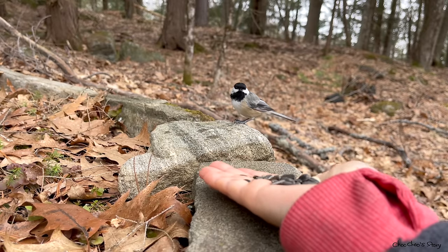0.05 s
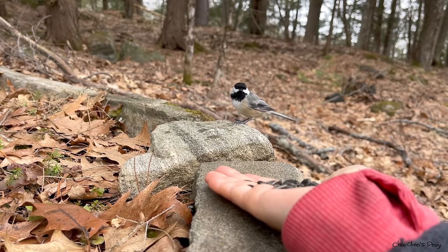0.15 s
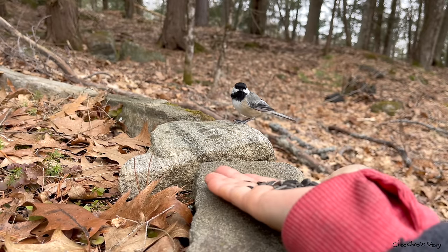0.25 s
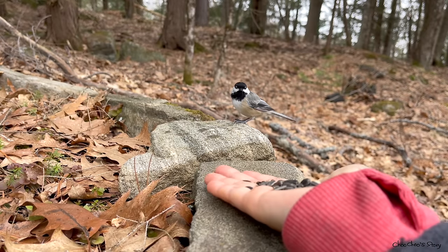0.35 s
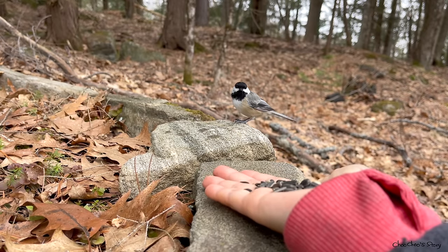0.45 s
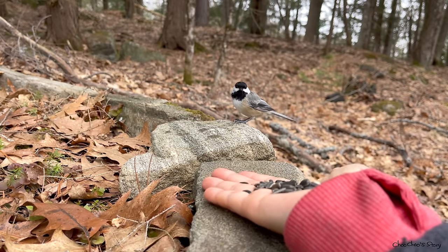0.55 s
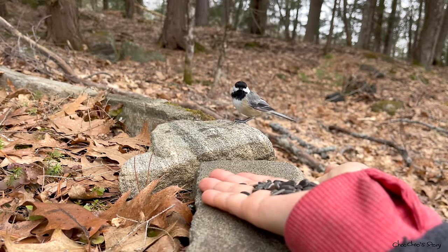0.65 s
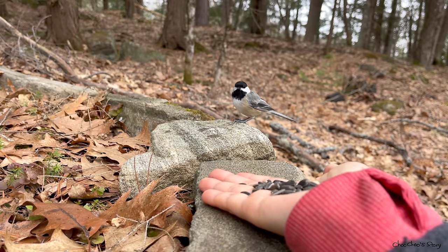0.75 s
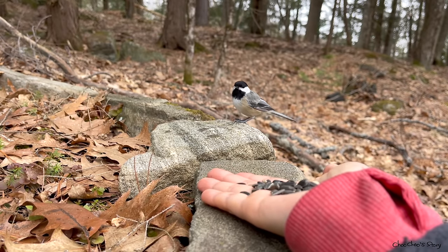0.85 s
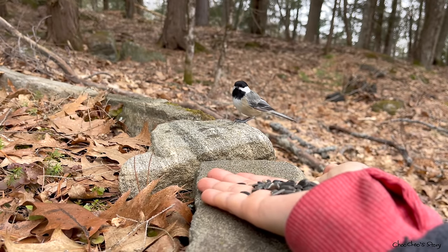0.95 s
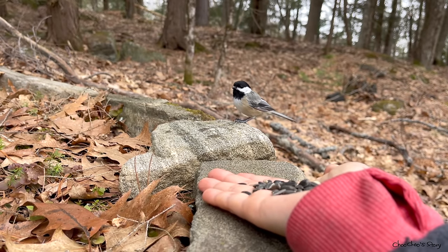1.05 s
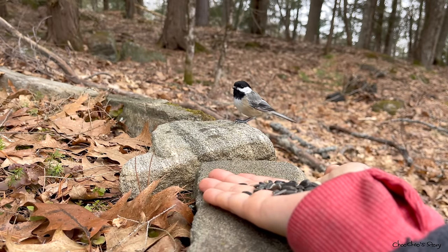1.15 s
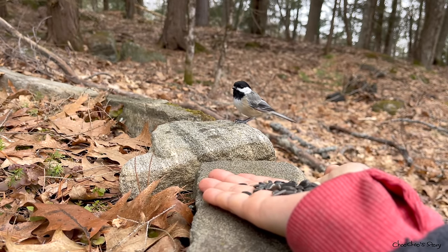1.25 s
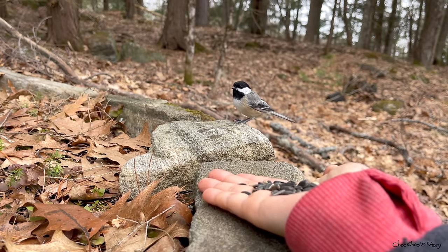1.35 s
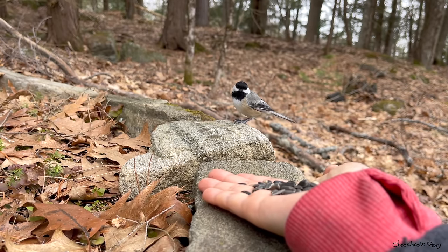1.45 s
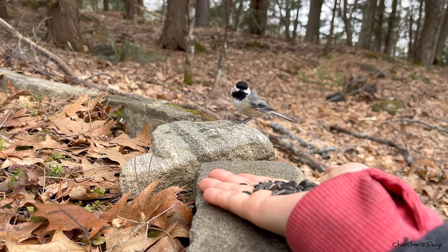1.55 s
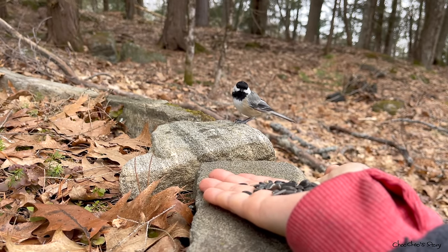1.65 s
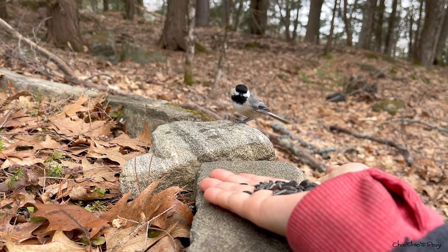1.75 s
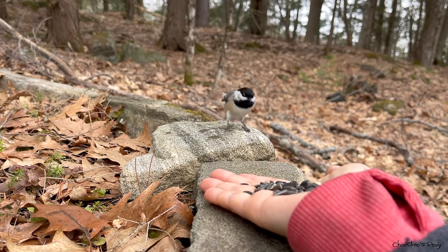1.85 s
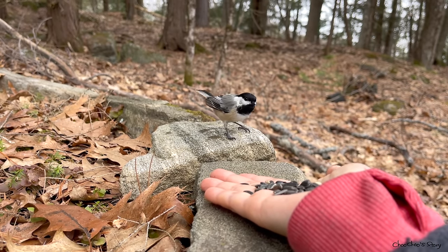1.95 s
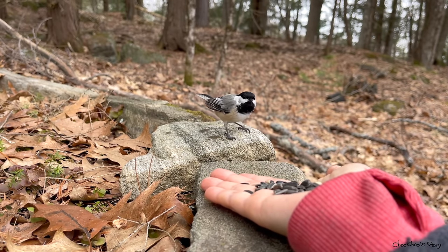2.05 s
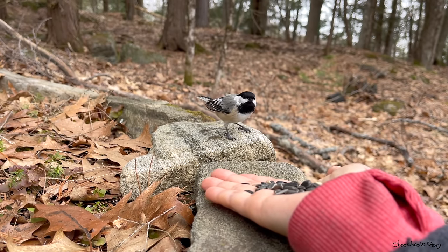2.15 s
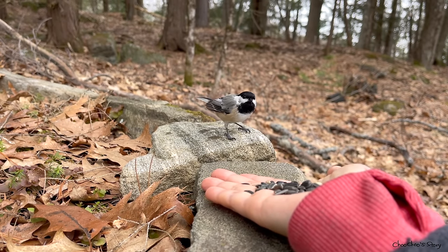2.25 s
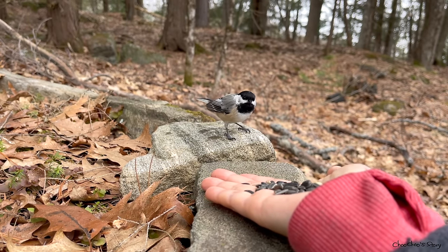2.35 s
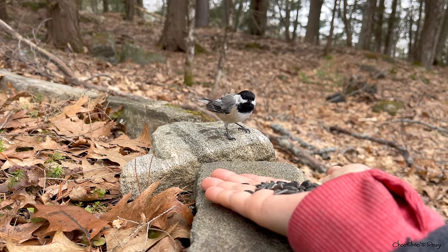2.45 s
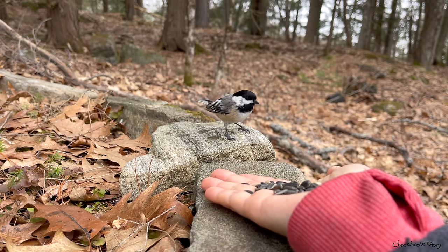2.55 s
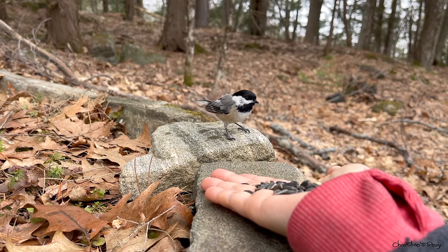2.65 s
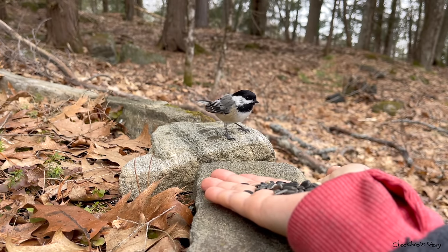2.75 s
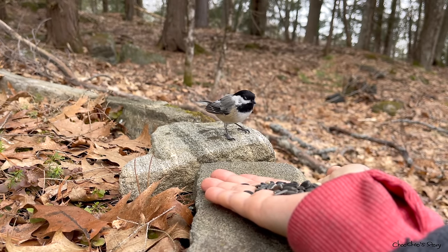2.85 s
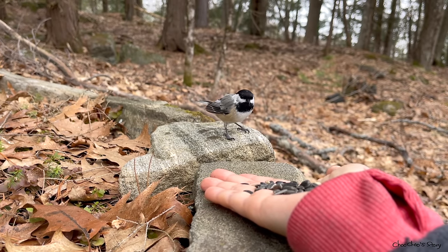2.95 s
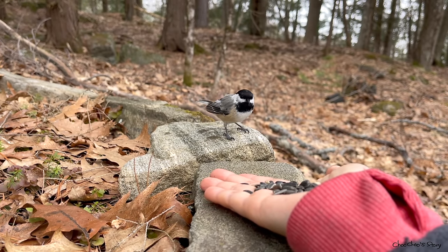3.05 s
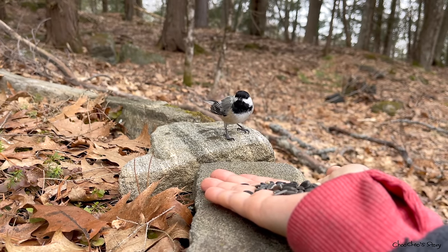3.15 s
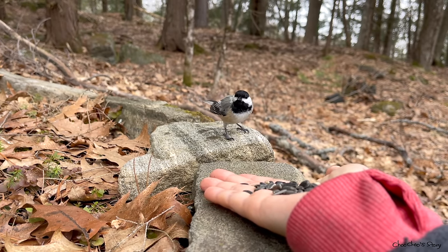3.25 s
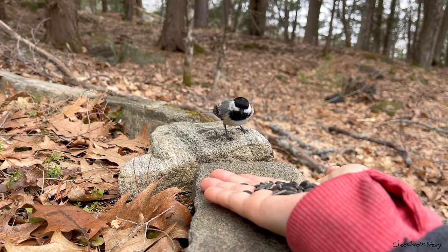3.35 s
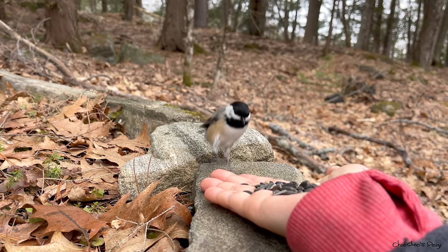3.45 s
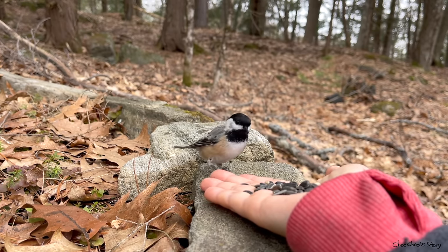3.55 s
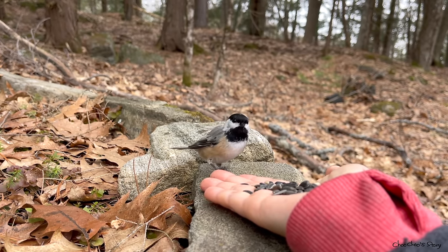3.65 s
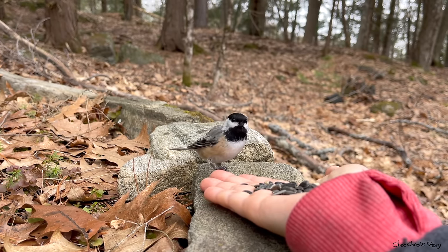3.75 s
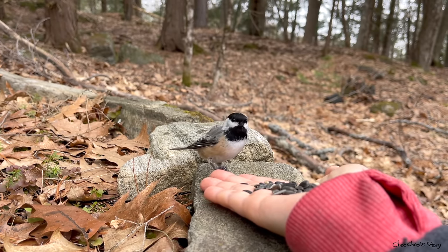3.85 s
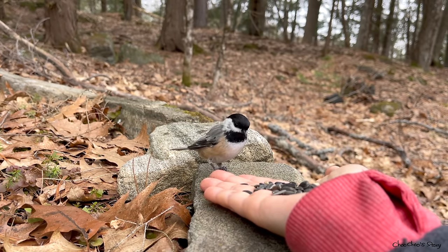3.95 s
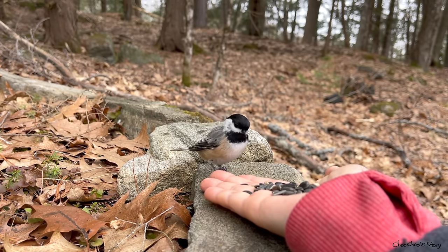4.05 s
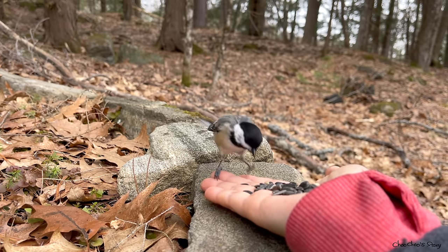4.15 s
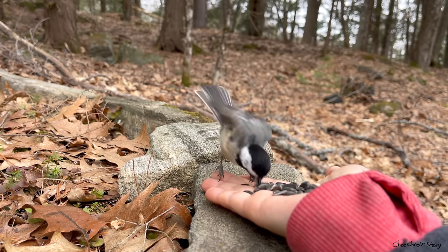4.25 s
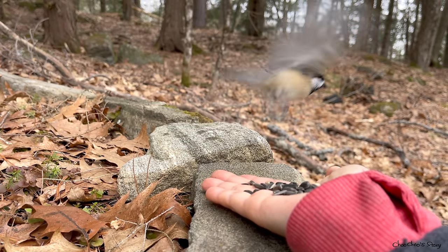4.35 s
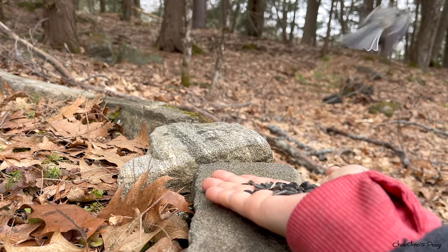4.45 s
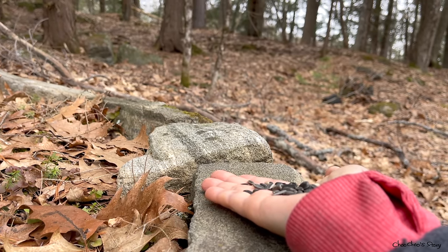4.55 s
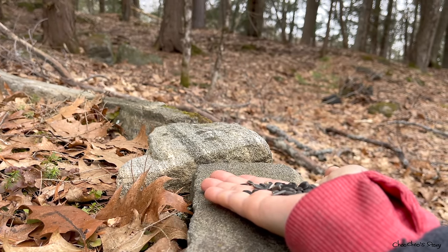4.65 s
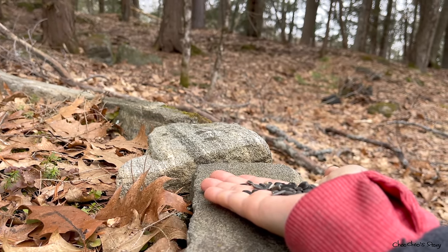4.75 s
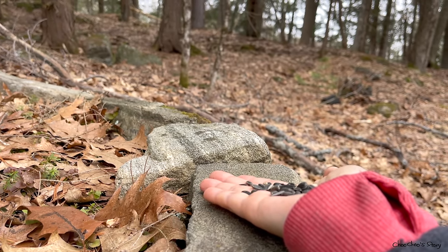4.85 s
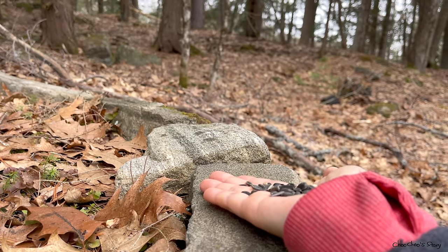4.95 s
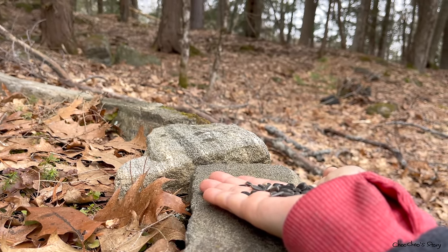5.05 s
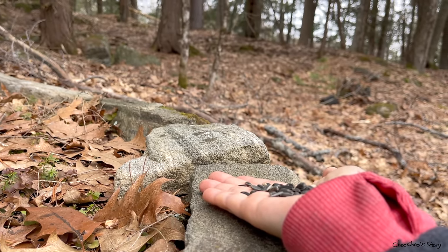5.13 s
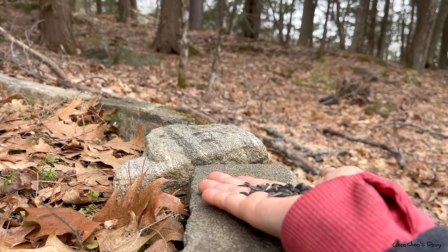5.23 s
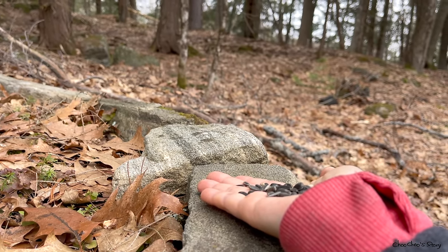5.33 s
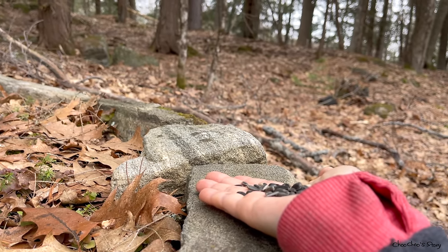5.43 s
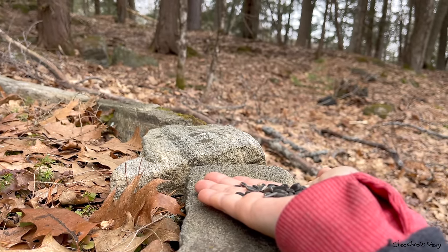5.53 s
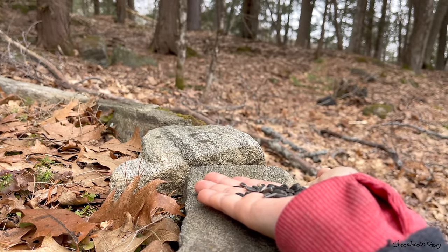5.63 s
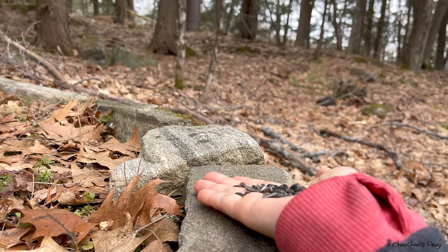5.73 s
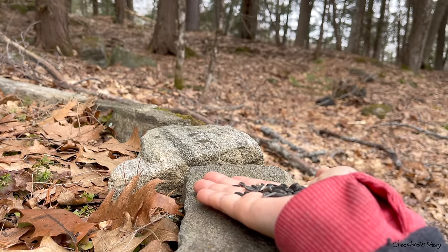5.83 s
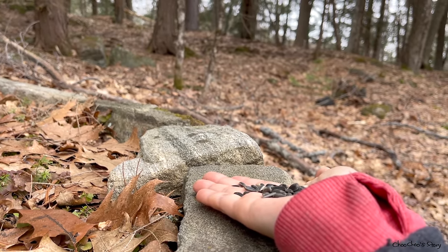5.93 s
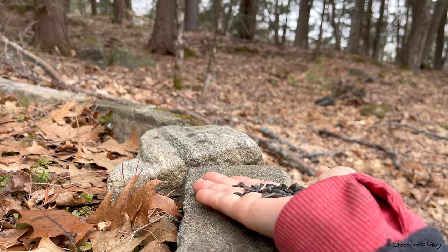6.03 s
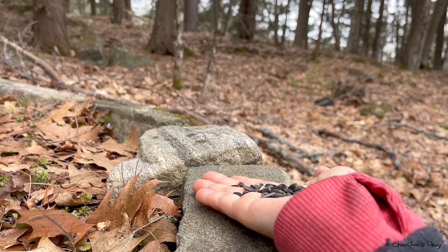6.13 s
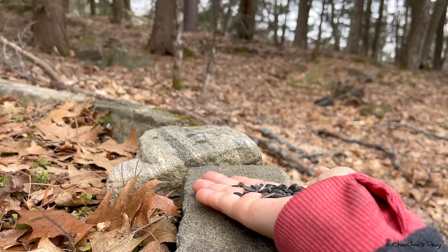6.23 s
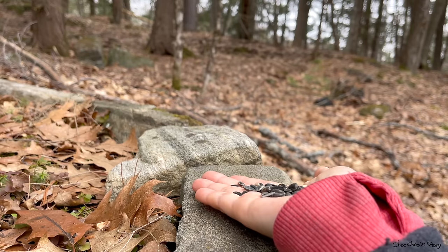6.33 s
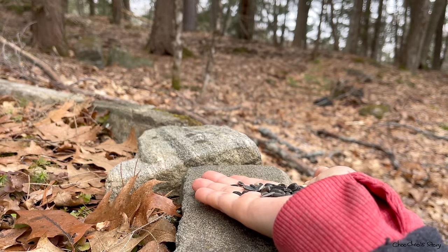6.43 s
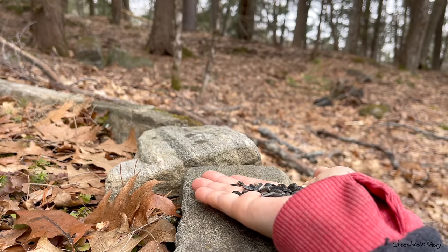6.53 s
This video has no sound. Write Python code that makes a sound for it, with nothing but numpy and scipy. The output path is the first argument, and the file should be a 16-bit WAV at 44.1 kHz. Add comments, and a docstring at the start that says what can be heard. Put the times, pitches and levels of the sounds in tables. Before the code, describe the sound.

A quiet woodland with soft, low distant traffic rumble swelling gently throughout, a faint wavering hum and slight hiss. A small songbird close by gives very short, thin whistled chips around 7 kHz: faint at 0.0, clear at 0.37, weaker at 1.35, 2.5 and 2.9, then by far the loudest, piercing, at 3.3. Tiny dry claw ticks sound around 1.75-1.85, 2.8-3.0 and 3.4. A far crow caws hoarsely with long echoes at 3.5, 4.0, 4.5 and 4.9, very faint. From 4.2 to 4.7 wings flutter close: about 25 rapid soft whumps a second, feather hiss, brief airy whistles and crackling seed ticks, fading away. A weaker flutter follows at 4.9-5.0. Faint echoing chips come at 5.2 and 6.0, crisp ticks at 5.5, and small wing puffs with leaf ticks at 6.0-6.2 and 6.3-6.5.

```python
"""A small songbird whistles thin, arching chirps with echoes; later its wings beat in short bursts.
Wing noise is made of air pushes, low whumps, hissing feathers and brief feather whistles.
Claws, husks, quills and dry leaves tick close by as short noise puffs; a far crow caws in hoarse pulses.
Behind it, shaped noise makes distant traffic and phone hiss, while wavering tones make a hum."""
import sys
import numpy as np
from scipy import signal
from scipy.fft import rfft, irfft, next_fast_len
from scipy.io import wavfile
from scipy.ndimage import uniform_filter1d, map_coordinates

SR = 44100
rng = np.random.default_rng(int(sys.argv[2]) if len(sys.argv) > 2 else 0)


def inscribe(sig):
    """Save sig as 16-bit PCM at rate SR to the path in sys.argv[1].

    A 1-D sig is mono; a 2-D sig holds one channel per row.
    Samples are clipped to [-1, 1] before scaling.
    """
    pcm = np.round(np.clip(np.atleast_2d(sig).T, -1, 1) * 32767)
    wavfile.write(sys.argv[1], SR, pcm.astype(np.int16))


N = 290574  # samples

# In noise colours the levels are relative: noise() scales the whole to rms 1.
# Traffic swells: (time [s], rumble [dB], roar [dB], drone [dB])
TRAFFIC = [(0, -48.5, -56, -67), (.4, -46.5, -55, -61), (.94, -46.5, -56, -70.5), (1.38, -43, -56.5, -57.5),
           (1.8, -44, -56, -60), (2.13, -43.5, -57, -55.5), (2.45, -46, -55, -55), (2.84, -44, -54, -58),
           (3.4, -45.5, -54.5, -61), (4.1, -47, -53.5, -62), (5.0, -45.5, -54, -65), (5.5, -44.5, -53, -62),
           (5.91, -47.5, -52.5, -77.5), (6.59, -45, -53, -69.5)]
# Deep traffic noise: (frequency [Hz], relative level per Hz [dB])
RUMBLE = [(11, -55), (18, -35), (32, -19.5), (34, -9.5), (41, -12), (59, 4.5), (92, -1.5), (123, -8),
          (177, -17.5), (200, -19), (260, -41), (440, -120)]
# Higher traffic noise: (frequency [Hz], relative level per Hz [dB])
ROAR = [(76, -35), (130, -4), (205, -12.5), (280, -19), (344, -19), (381, -19.5), (810, -22.5), (2000, -48),
        (2600, -78), (4400, -120)]
# Traffic noise between rumble and roar: (frequency [Hz], relative level per Hz [dB])
DRONE = [(120, -40.5), (170, -2), (230, 1.5), (320, -3.5), (430, -8.5), (600, -39.5), (900, -120)]
# Phone's own hiss: (frequency [Hz], relative level per Hz [dB])
HISS = [(1000, -21.5), (1800, 1), (4000, -2.5), (6000, -3), (8500, -3), (10800, -1), (12000, -5),
        (13200, -25), (14000, -47.5)]
# Loudness of the motor hum: (time [s], level [dB])
HUM = [(0, -56), (.7, -52), (1.25, -51), (1.45, -56), (2, -44), (2.5, -52), (3.3, -49.5), (3.45, -63),
       (3.95, -48.5), (4.17, -61), (4.4, -34.5), (4.72, -42.5), (5.1, -37), (5.35, -45.5), (5.57, -52.5),
       (5.75, -45), (6.25, -47.5), (6.59, -60)]
# Brief far tones: (time [s], hold [s], frequency [Hz], level [dB], wander [Hz])
FAINT_TONES = [(1.63, .13, 2130, -82, 70), (2.27, .5, 221, -59, 1.5)]
# Faint steady whine: (frequency [Hz], width [Hz], level [dB])
WHINE = [(3395, 180, 0)]
WHINE_DB = -90.5
# How alike the two microphone ports hear the background: (frequency [Hz], likeness [-1 to 1])
ALIKE = [(60, .9995), (130, .99), (290, .7), (640, .1), (1300, .2), (2000, .7), (3000, .3), (5000, .5),
         (6000, .97), (7500, .72), (9000, .99), (10800, .72), (12500, .99)]

# Songbird chirps; bend over 1 eases into the top, under 1 flicks up to it; the start is before the scoop:
# (time [s], length [s], level [dB], start [Hz], top [Hz], end [Hz], top at [share of length],
#  bend of the climb [power], loudest at [share of length], octave over level [dB], echo [dB])
CHIRPS = [(0.002, 0.036, -31, 7040, 7630, 4540, 0.85, 0.69, 0.54, -49, -16.5),
          (0.366, 0.053, -21, 7120, 7728, 7377, 0.66, 2.6, 0.46, -22.5, -23),
          (1.35, 0.042, -33.5, 6390, 7620, 5450, 0.88, 1, 0.74, -53, -17),
          (2.512, 0.043, -37, 6770, 7580, 4680, 0.73, 0.56, 0.52, -41, -16),
          (2.875, 0.055, -44, 6340, 7200, 6000, 0.63, 0.45, 0.52, -34, -14),
          (3.323, 0.048, -6.5, 6785, 7514, 7000, 0.65, 3.1, 0.55, -31, -33),
          (3.862, .045, -68.5, 6750, 7650, 6690, 0.69, 1, 0.41, -44, 3),
          (5.226, 0.05, -46, 6690, 7370, 6890, 0.67, 2.8, 0.47, -40, -6.5),
          (6.027, 0.053, -47.5, 6980, 7550, 7400, 0.66, 0.91, 0.34, -44, -1.5)]
# Faint noise band around the whistle: (frequency [Hz], relative level per Hz [dB])
SKIRT = [(4200, -57), (5300, -8.5), (6800, -1), (8200, 3.5), (9200, -57.5)]
FALL_BEND = 2.6  # power
SCOOP_SHARE, SCOOP_S = 0.28, 0.0036  # the onset scoops up by this share of the final drop
EDGE_SOFTNESS, QUAVER_DB = 0.83, .5
OCTAVE_SOFTNESS, OCTAVE_QUAVER_DB, OCTAVE_ECHO_DB = .5, 2.5, 6  # octave echo over the whistle's
TREES_T60_S, FAR_T60_S = 0.23, .2  # chirps with more echo ring longer
BOUNCE_S, BOUNCE_DB = 0.0031, 9  # a copy off the ground, over the echo level

# Ticks of claws, husks, snapping quills and dry leaves:
# (time [s], peak level [dB], body over peak [dB], brush over peak [dB])
TICKS = [(1.7325, -68, -7.5, -15), (1.757, -49, -9, -12), (1.775, -60, 0, -7), (1.8262, -63, -9, -7),
         (1.847, -57, -2, -7), (1.858, -54, -3, -9), (2.4466, -60, -1, -13), (2.82, -55, -6, -8),
         (2.838, -56, -20, 0), (3.003, -48.5, -9, -2), (3.0365, -61, -17, -4.5), (3.441, -50, -1.5, -2.5),
         (3.9419, -61, -6.5, -9.5), (4.0916, -61, -7, -7.5), (4.1966, -47.5, -26, -3),
         (4.2485, -36.5, -25, -19), (4.2893, -44, 13, 11), (4.327, -35.5, 5, 0.5), (4.3667, -30, 0.5, -3.5),
         (4.394, -36.5, 2, -5), (4.409, -27.5, -28, -1.5), (4.4578, -43, -18, 11), (4.487, -46, 7, 5),
         (4.509, -56, 20.5, 19), (4.6076, -59.5, 21.5, 5), (4.667, -52, 10, -1), (4.9225, -54.5, -21, 8.5),
         (5.215, -60, -13.5, -3), (5.227, -59, -10, -5.5), (5.4955, -38.5, -20, -7), (5.509, -43, -11, -4),
         (6.049, -39.5, -13, -29), (6.071, -44, -15, -20), (6.219, -51, -7.5, -14.5),
         (6.356, -38.5, -3.5, -8), (6.538, -48, -14, -23), (4.941, -57, -1, 9.5),
         (4.599, -51.5, -15.5, 9.5)]
TICK_T60_S, TICK_SHEEN_DB = 0.035, -24  # sheen over the peak

# Crow caws: (time [s], length [s], pitch before scoop and sag [Hz], level [dB], shrillness over level [dB],
#  noise over pulse at the onset [times], noise over pulse at the end [times])
CAWS = [(3.513, 0.29, 653.3, -58, -19, 3.7, 4.1), (3.974, 0.29, 693, -56.5, -25, 1.9, 9),
        (4.47, 0.33, 690, -58.5, -28, 3.5, 5.5), (4.924, 0.37, 679.5, -57.5, -25.5, 3.5, 11)]
# Crow's throat: (frequency [Hz], width [Hz], level [dB])
THROAT = [(1204, 720, -4.5), (1840, 860, -9)]
# Crow's throat with the beak opened wider: (frequency [Hz], width [Hz], level [dB])
THROAT_WIDE = [(1303, 740, -6), (1650, 600, -1), (2004, 590, -14)]
# Crow's shrill beak ring: (frequency [Hz], width [Hz], level [dB])
BEAK = [(3280, 560, 0)]
CAW_ATTACK_S, CAW_RELEASE_S, CAW_FADE_DB = .06, .05, 5
CAW_SCOOP, CAW_SAG, CAW_SCOOP_S = 0.26, 0.12, .028  # scoop and sag are shares of the pitch
CAW_OPEN_SHARE, CAW_OPEN_WIDTH = 0.61, 0.26  # the beak is widest at this share of the caw
VOICED_DB, VOICED_THIRD_DB = -4.5, -8

# Wing beats: (time [s], air push [dB], feather hiss [dB])
BEATS = [(4.213, -59, -37), (4.241, -43, -68), (4.284, -22.5, -36), (4.3274, -25, -36.5),
         (4.3614, -19.5, -37.5), (4.405, -23.5, -35.5), (4.4413, -26.5, -58), (4.48, -27, -68),
         (4.525, -29, -43), (4.566, -31, -56), (4.598, -30.5, -46), (4.641, -35, -55), (4.6803, -38, -51.5),
         (4.712, -44, -53), (4.8554, -61, -57), (4.9042, -40.5, -60), (4.941, -44.5, -62),
         (4.983, -42, -72.5), (5.018, -40, -71.5), (6.0423, -44, -59), (6.0925, -39, -47),
         (6.129, -42, -45), (6.1706, -36.5, -45.5), (6.314, -52.5, -50.5), (6.351, -38, -55),
         (6.38, -39.5, -57), (6.536, -54, -54)]
# Steady rubbing of feathers and leaves, with draught on the ports:
# (time [s], hold [s], hiss [dB], swish [dB], scrape [dB], gloss [dB], draught [dB], time to fall 60 dB [s])
RUSTLES = [(4.221, 0.15, -54, -56, -79, -64, -42.5, 0.27),
           (4.386, 0.031, -40.5, -50.5, -52.5, -63, -29, 0.48),
           (4.874, .05, -69, -62, -76, -95, -62.5, 0.54),
           (5.473, 0.0099, -63.5, -73, -70, -76, -66.5, 0.35), (5.98, .03, -65, -80, -78.5, -74, -68, 0.42),
           (6.032, 0.15, -66, -70.5, -63.5, -99, -41.5, 0.11),
           (6.3, 0.061, -61, -80.5, -63.5, -88.5, -46, 0.18), (6.504, 0.054, -71, -84, -84, -92, -56, 0.41)]
# Bright feather hiss: (frequency [Hz], relative level per Hz [dB])
FEATHER = [(6000, -48), (7500, -9.5), (9000, -4), (10200, 2), (11700, -6.5), (12400, -43), (13200, -40),
           (14000, -120)]
# Softer brushing: (frequency [Hz], relative level per Hz [dB])
BRUSH = [(2200, -44), (3300, -6.5), (5000, -2), (7500, 2.5), (9000, -5), (10500, -52)]
# Broad swish: (frequency [Hz], relative level per Hz [dB])
SWISH = [(500, -1), (1200, 2.5), (2200, -3.5), (3000, -6), (4000, -9), (4600, -30), (6000, -81)]
# Rough scrape: (frequency [Hz], relative level per Hz [dB])
SCRAPE = [(1200, -40), (1600, 15.5), (2100, 15), (2800, 13), (3250, -25), (3600, -1), (4600, 2),
          (5000, -32)]
# Top edge of close strokes: (frequency [Hz], relative level per Hz [dB])
SHEEN = [(11000, -42), (12500, 0), (14000, -7.5), (15500, -12.5)]
# Top edge of steady rubbing: (frequency [Hz], relative level per Hz [dB])
GLOSS = [(11500, -30), (12300, 8), (13400, -10), (14000, -34), (15000, -69)]
# Low thud of moved air: (frequency [Hz], relative level per Hz [dB])
WHUMP = [(90, -37), (150, 3), (200, 4.5), (320, -0.5), (450, -5.5), (800, -12), (1300, -27), (2500, -120)]
# Air snapped under the wing: (frequency [Hz], gain [dB])
CLAP = [(60, -34.5), (140, 1), (230, 3.5), (330, -0.5), (480, -10.5), (800, -14), (1600, -52), (3000, -120)]
PUFF_S = 0.0126
WHUMP_DB, CLAP_DB = -4.5, 32.5  # over the push
SWISH_DB, BRUSH_DB, RUB_BRUSH_DB = -8, -15, -4.5  # over the hiss
SHEEN_DB, SHEEN_GROWS = -54.5, 1.4  # level at the strongest stroke; fades faster than the hiss
RUSTLE_ATTACK_S, FLURRY_DB = 0.022, -14  # flurry: steady low flutter over the draught
CRACKLE_PER_S, CRACKLE_S, CRACKLE_DB = 500, .0008, -8

# Feather whistles: (time [s], top pitch [Hz], level [dB], octave level [dB])
WHISTLES = [(4.376, 1074, -40, -56), (4.413, 1270, -34.5, -57), (4.452, 1252, -37, -58),
            (4.492, 1220, -38.5, -54), (4.534, 1260, -41.5, -50), (4.572, 1260, -43.5, -49),
            (4.614, 1260, -41, -48.5), (4.651, 1254, -45.5, -51), (4.692, 1215, -52, -52.5),
            (4.857, 1290, -59, -68), (4.9, 1276, -61, -61), (4.945, 1250, -50, -63),
            (4.986, 1280, -59.5, -66), (5.011, 1320, -48, -71)]
WHISTLE_S, WHISTLE_TOP_SHARE, WHISTLE_ARCH = .02, .4, .4
WHISTLE_THIRD_DB = -22  # over the octave

# Turn of phase between the channels: (frequency [Hz], lead of the left [radians])
LEAD = [(0, 0), (200, -.08), (600, -.4), (1900, 0), (2600, .7), (4150, .8), (4850, 3.14), (5500, 6.1),
        (6250, 6.35), (7500, 8), (8650, 9.4), (9400, 9.45), (10300, 10.6), (12000, 12.5), (13400, 12.6),
        (14200, 14.3), (15600, 14.6)]
# Level tilt between the channels: (frequency [Hz], left over right [dB])
TILT = [(100, 0), (300, 1.7), (700, .8), (1200, 0.8), (2500, -0.9), (5000, 0)]
BASS_CUT_HZ, TOP_HZ = 25, 15900


def amp(db):
    """Turns dB into gain."""
    return 10 ** (np.asarray(db) / 20)


def unit(x):
    """Scales a sound to rms 1."""
    return x / np.sqrt(np.mean(x ** 2) + 1e-20)


def along(points, hz):
    """Reads a curve of (frequency [Hz], value) points on a log axis."""
    f, v = np.transpose(points)
    return np.interp(np.log(hz + 1), np.log(f + 1), v)


def curves(rows):
    """Gives one value per sample for each column after the time."""
    s, *cols = np.transpose(rows)
    return [np.interp(np.arange(N) / SR, s, c) for c in cols]


def wobble(rate):
    """Makes a smooth random curve with this many knots a second."""
    knots = rng.standard_normal(int(N * rate / SR) + 4)
    return map_coordinates(knots, [np.arange(N) * rate / SR])


def filtered(x, response):
    """Shapes x by a complex response over frequency."""
    m = next_fast_len(N + SR // 2)
    return irfft(rfft(x, m) * response(np.fft.rfftfreq(m, 1 / SR)), m)[..., :N]


def noise(spectrum, alike=((1, 1),)):
    """Makes stereo noise of rms 1 whose channels share the given likeness."""
    def colour(hz):
        turn = np.arccos(np.clip(along(alike, hz), -1, 1)) / 2
        return amp(along(spectrum, hz)) * [np.cos(turn), np.sin(turn)]
    mid, side = filtered(rng.standard_normal((2, N)), colour)
    return unit(np.array([mid + side, mid - side]))


def modes(table, hz):
    """Causal response of a table of resonances, applied twice for steep flanks."""
    total = 0
    for k, (centre, width, db) in enumerate(table):
        ring = 1j * hz * width / (centre * centre - hz * hz + 1j * hz * width)
        total = total + (-1) ** k * amp(db / 2) * ring
    return total ** 2


def held(s, hold, attack, t60):
    """Loudness curve: straight rise, hold, then exponential fall."""
    t = np.arange(N) / SR - s
    return np.clip(t / attack, 0, 1) * amp(-60 * np.maximum(t - attack - hold, 0) / t60)


def puffs(times, levels_db, fall, rise):
    """Loudness curve of overlapping puffs, each a soft rise and an exponential fall."""
    env, t = np.zeros(N), np.arange(SR // 5) / SR
    puff = (1 - np.exp(-(t / rise) ** 2)) * np.exp(-t / fall)
    for s, db in zip(times, levels_db):
        add(env, s - rise, amp(db) * puff)
    return env


def add(track, s, sound):
    """Mixes a sound into the track at s seconds."""
    part = track[..., round(s * SR):round(s * SR) + sound.shape[-1]]
    part += sound[..., :part.shape[-1]]


def echoes(x, t60, alike):
    """Scatter from trunks and ground: a fading noise tail of energy 1, partly shared by the ports."""
    t = np.arange(int(SR * .8)) / SR
    shared, split = rng.standard_normal((2, len(t))) * amp(-60 * t / t60)
    turn = np.arccos(np.clip(alike, 0, 1)) / 2
    tail = np.cos(turn) * shared + np.sin(turn) * np.array([split, -split])
    return signal.fftconvolve(x[None], tail / np.linalg.norm(tail[0]), axes=1)


def crackle():
    """Gain that bumps up at random instants and drops back within milliseconds."""
    draw, t = rng.random((2, N)), np.arange(SR // 50) / (CRACKLE_S * SR)
    snaps = (draw[0] < CRACKLE_PER_S / SR) * amp(CRACKLE_DB) * -np.log(1 - draw[1])
    return unit(1 + signal.fftconvolve(snaps, t * np.exp(1 - t))[:N])


def background():
    """Far traffic noise in swells, a wavering motor hum, faint tones and steady microphone hiss."""
    rumble_db, roar_db, drone_db = curves(TRAFFIC)
    hum_db, = curves(HUM)
    rumble = amp(rumble_db + 2.2 * wobble(6.8)) * noise(RUMBLE, ALIKE)
    roar = amp(roar_db + 0.66 * wobble(4.0)) * noise(ROAR, ALIKE)
    drone = amp(drone_db + 1.5 * wobble(4.6)) * noise(DRONE, ALIKE)
    hum_hz = 121 + 1.541 * wobble(3.7)
    hum = amp(hum_db + 0.48 * wobble(12)) * np.sin(2 * np.pi * np.cumsum(hum_hz) / SR)
    ringing = unit(filtered(rng.standard_normal(N), lambda f: modes(WHINE, f)))
    whine = amp(WHINE_DB + 1.5 * wobble(2.2)) * ringing
    tones = np.zeros(N)
    for s, hold, hz, db, wander in FAINT_TONES:
        level = held(s, hold, .05, .4) * amp(db + 4.2 * wobble(12))
        tones += level * np.sin(2 * np.pi * np.cumsum(hz + wander * wobble(60)) / SR)
    return rumble + roar + drone + hum + whine + tones + amp(-74) * noise(HISS, ALIKE)


def chirps():
    """A whistled arch of pitch with a faint octave, a near bounce off the stones, then echo in the trees."""
    out, skirt_noise = np.zeros((2, N)), noise(SKIRT)[0]
    quaver, burr = amp(QUAVER_DB * wobble(680)), amp(OCTAVE_QUAVER_DB * wobble(1400))
    for s, length, db, start, top, end, crest, bend, loudest, octave_db, echo_db in CHIRPS:
        u = np.arange(int(length * SR)) / (length * SR)  # share of the chirp gone by
        now = slice(round(s * SR), round(s * SR) + len(u))
        rising = top - (top - start) * (np.maximum(crest - u, 0) / crest) ** bend
        rising -= SCOOP_SHARE * (top - end) * np.exp(-u * length / SCOOP_S)
        falling = (top - end) * (np.maximum(u - crest, 0) / (1 - crest)) ** FALL_BEND
        hz = uniform_filter1d(rising - falling, size=110, mode="nearest")
        phase = 2 * np.pi * np.cumsum(hz) / SR
        # bending time puts the middle of the sine arch at the loudest point
        peak_bend = np.log(.5) / np.log(np.clip(loudest, .1, .9))
        swell = np.sin(np.pi * u ** peak_bend) ** EDGE_SOFTNESS * quaver[now]
        skirt = amp(-39 - 12 * u) * skirt_noise[now]
        call = amp(db + 3) * swell * (np.sin(phase) + skirt)
        octave = amp(db + octave_db) * swell ** OCTAVE_SOFTNESS * burr[now] * np.sin(2 * phase)
        near = call + octave
        octave_echo = amp(np.minimum(echo_db + OCTAVE_ECHO_DB, -10))
        add(out, s + 0.0054, octave_echo * echoes(octave, t60=.12, alike=0.96))
        add(out, s, near)
        add(out, s + BOUNCE_S, amp(np.minimum(echo_db + BOUNCE_DB, -8)) * call)
        add(out, s + .0015, amp(-24) * echoes(near, t60=.04, alike=.95))
        trees_t60 = TREES_T60_S + FAR_T60_S * amp(np.minimum(echo_db, 0))
        add(out, s + .006, amp(echo_db) * echoes(call, trees_t60, alike=0.94))
    return out


def ticks():
    """Dry contacts: a sharp bright crack over a duller body, both fading at the same rate."""
    s, db, body_db, brush_db = np.transpose(TICKS)
    fall = TICK_T60_S / np.log(1000)
    crack = puffs(s, db, fall, rise=0.00076) * noise(FEATHER, [(1, 1.0)])
    brush = puffs(s, db + brush_db, fall, rise=0.0028) * noise(BRUSH, [(1, 0.31)])
    sheen = puffs(s, db + TICK_SHEEN_DB, fall, rise=0.001) * noise(SHEEN, [(1, .9)])
    body = puffs(s, db + body_db, fall, rise=0.0038) * noise(SWISH, [(1, 1.0)])
    return crack + brush + sheen + body


def crow():
    """Hoarse strong and weak pulses with a voiced core, through a beak that opens and shuts; much echo."""
    dry, shrill, t = np.zeros(N), np.zeros(N), np.arange(N) / SR
    for s, length, pitch_hz, db, shrill_db, hoarse_first, hoarse_last in CAWS:
        u = np.clip((t - s) / length, 0, 1)  # share of the caw gone by
        hz = pitch_hz * (1 - CAW_SAG * u - CAW_SCOOP * np.exp(-u * length / CAW_SCOOP_S))
        cycles = np.cumsum(hz * (1 + .03 * wobble(70))) / SR
        pulse = np.exp(6 * (np.cos(2 * np.pi * cycles) - 1))
        pulse *= 1 + 0.3 * np.cos(np.pi * cycles)  # every other pulse is weaker
        hoarse = hoarse_first + (hoarse_last - hoarse_first) * u ** 2
        rasp = pulse * (1 + hoarse * rng.standard_normal(N))
        rasp /= np.hypot(1, .5 * hoarse)
        rasp *= (u > 0) & (u < 1)
        narrow, wide, beak = [unit(filtered(rasp, lambda f: modes(m, f))) * np.sqrt(length * SR / N)
                              for m in (THROAT, THROAT_WIDE, BEAK)]
        edges = np.minimum(np.minimum(u * length / CAW_ATTACK_S, (1 - u) * length / CAW_RELEASE_S), 1)
        opened = np.exp(-((u - CAW_OPEN_SHARE) / CAW_OPEN_WIDTH) ** 2)
        voiced = np.sin(4 * np.pi * cycles) + amp(VOICED_THIRD_DB) * np.sin(6 * np.pi * cycles)
        voiced *= amp(VOICED_DB + 3.7 * wobble(60))
        level = edges * amp(db - CAW_FADE_DB * u + 0.82 * wobble(29))
        dry += ((1 - opened) * (narrow + voiced) + opened * wide) * level
        shrill += edges * amp(db + shrill_db) * beak
    return dry + shrill + amp(1.5) * echoes(dry, t60=.95, alike=0.4)[:, :N]


def wings():
    """Each beat pushes air at the ports, whumps and hisses; longer rustles crackle and stir a draught."""
    s, push_db, hiss_db = np.transpose(BEATS)
    start, hold, *levels_db, t60 = np.transpose(RUSTLES)
    rustling = np.array([held(a, h, RUSTLE_ATTACK_S, d) for a, h, d in zip(start, hold, t60)])
    rub, sweep, scrape, gloss, draught = amp(levels_db) @ rustling
    rub, sweep, scrape = rub * crackle(), sweep * crackle(), scrape * crackle()
    stroke = puffs(s, hiss_db, PUFF_S, rise=0.0092)
    sheen_db = SHEEN_DB + SHEEN_GROWS * (hiss_db - hiss_db.max())
    sheen = puffs(s, sheen_db, PUFF_S, rise=.004)
    out = draught * (noise(RUMBLE) + amp(FLURRY_DB) * noise(WHUMP))
    slips_db = 1.2 * wobble(300)  # barbs catch and slip
    layers = [(stroke + rub, FEATHER),
              (amp(BRUSH_DB) * stroke + amp(RUB_BRUSH_DB) * rub, BRUSH),
              (amp(SWISH_DB) * stroke + sweep, SWISH),
              (sheen, SHEEN), (gloss, GLOSS), (scrape, SCRAPE)]
    for level, colour in layers:
        grain = amp(slips_db + 2.5 * wobble(100))
        out += level * grain * noise(colour, [(1000, 1.0), (3000, 0.95), (10000, 0.98)])
    out += puffs(s, push_db + WHUMP_DB, fall=0.0093, rise=0.0027) * noise(WHUMP, [(1, 1.0)])
    claps = np.zeros(N)
    claps[np.round((s + .003) * SR).astype(int)] = amp(push_db + CLAP_DB)
    out += filtered(claps, lambda hz: amp(along(CLAP, hz)))
    t = np.arange(SR // 10) / SR
    # pressure swing of down- and up-stroke
    swing = np.sin(2 * np.pi * 78 * t) + 0.74 * np.sin(2 * np.pi * 46 * t)
    push = swing * (t / 0.016) * np.exp(1 - t / 0.013)
    for beat, db in zip(s, push_db):
        add(out, beat - .012, amp(db) * push)
    return out


def whistles():
    """Brief feather tones in the first two flurries: an arching tone, two overtones and a little echo."""
    dry, u = np.zeros(N), np.arange(round(WHISTLE_S * SR)) / (WHISTLE_S * SR)
    arch = 1 - WHISTLE_ARCH * (u - WHISTLE_TOP_SHARE) ** 2
    for s, hz, db, octave_db in WHISTLES:
        phase = 2 * np.pi * np.cumsum(hz * arch) / SR
        overtones = np.sin(2 * phase) + amp(WHISTLE_THIRD_DB) * np.sin(3 * phase)
        tone = amp(db) * np.sin(phase) + amp(octave_db) * overtones
        add(dry, s - .004, np.sin(np.pi * u) ** 2 * tone)
    dry *= amp(2 * wobble(400))
    return dry + amp(-19) * echoes(dry, t60=.2, alike=.5)[:, :N]


def scene():
    """Everything at the two microphone ports."""
    return background() + chirps() + ticks() + crow() + wings() + whistles()


def record(dry):
    """Splits phase lead and level tilt between the channels, rolls off deep bass and cuts the top."""
    f, turn = np.transpose(LEAD)
    side = np.array([[.5], [-.5]])  # half to each channel

    def response(hz):
        band = hz ** 2 / np.hypot(hz ** 2, BASS_CUT_HZ ** 2) * (hz < TOP_HZ)
        lead = np.exp(1j * side * np.interp(hz, f, turn))
        return lead * amp(side * along(TILT, hz)) * band
    return filtered(dry, response)


dry = scene()
out = record(dry)
inscribe(out)
```